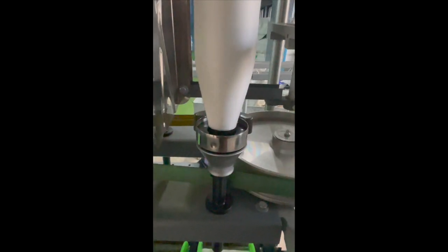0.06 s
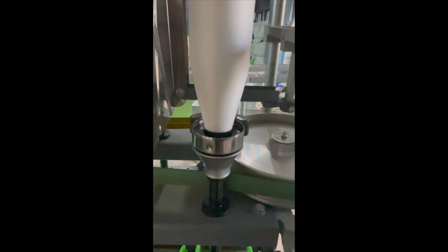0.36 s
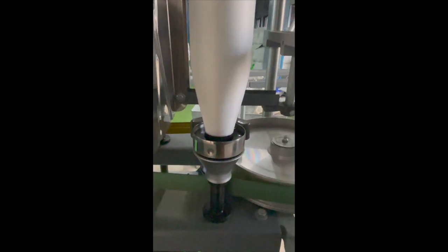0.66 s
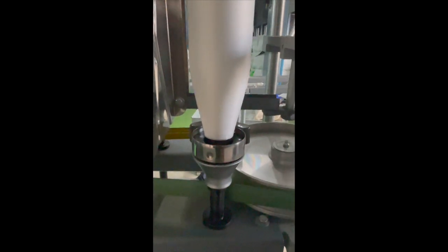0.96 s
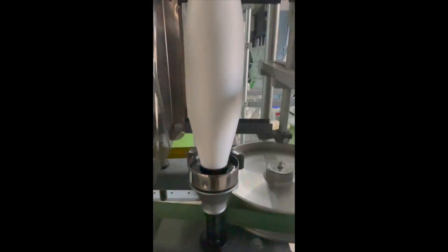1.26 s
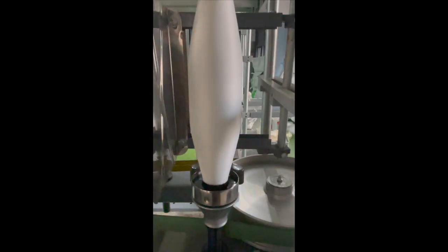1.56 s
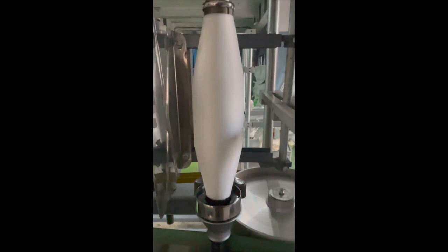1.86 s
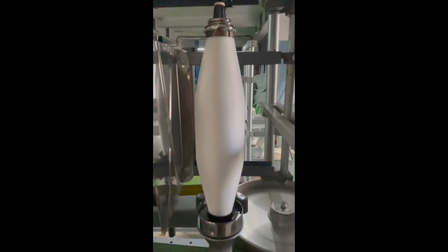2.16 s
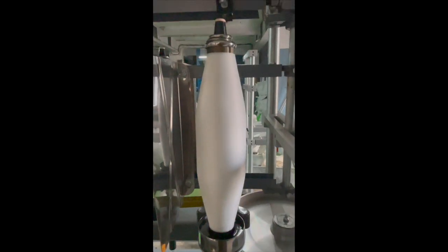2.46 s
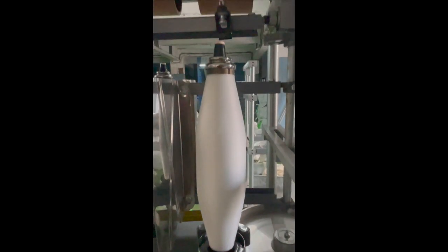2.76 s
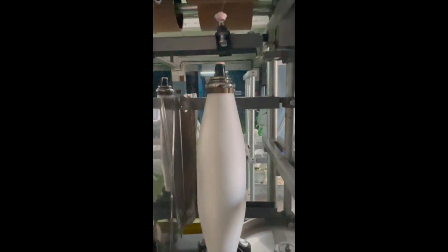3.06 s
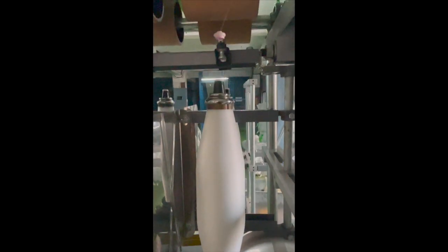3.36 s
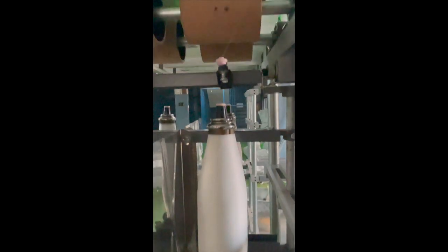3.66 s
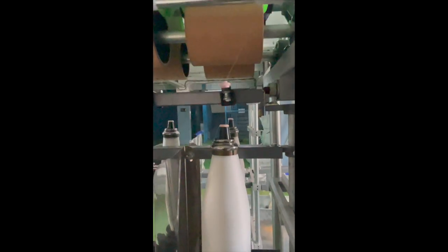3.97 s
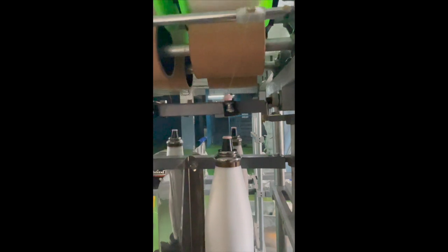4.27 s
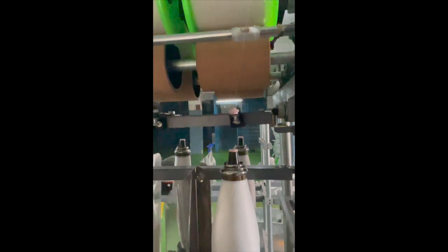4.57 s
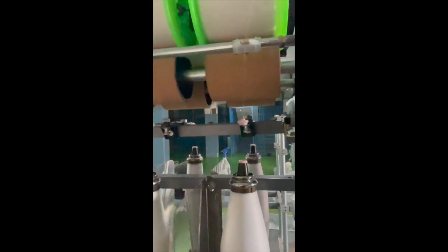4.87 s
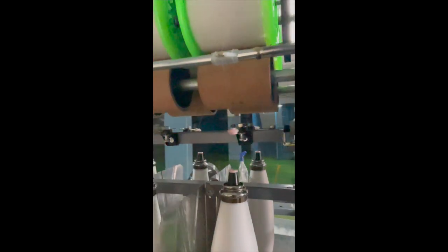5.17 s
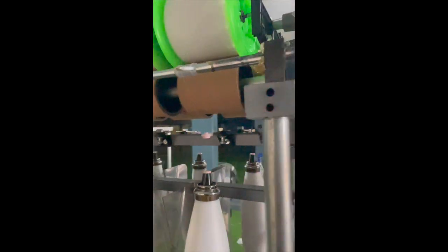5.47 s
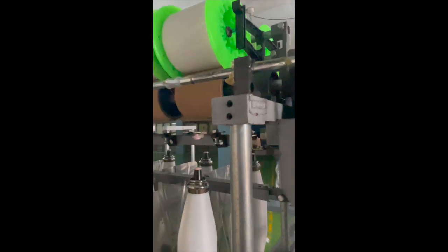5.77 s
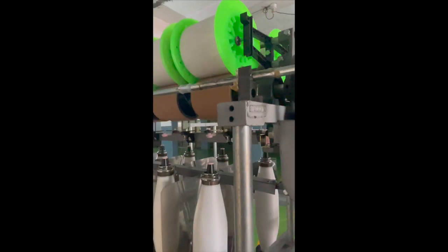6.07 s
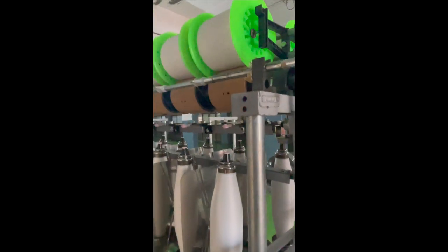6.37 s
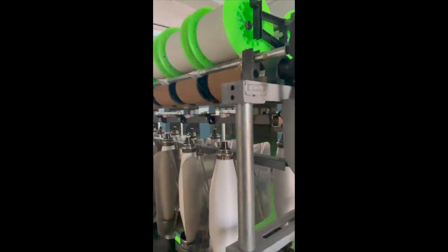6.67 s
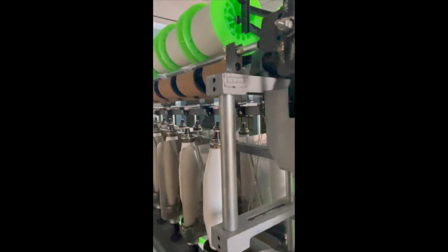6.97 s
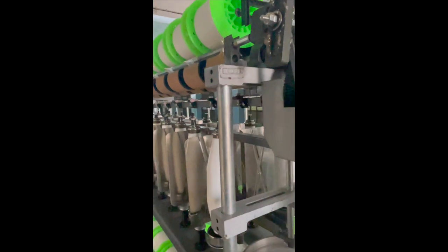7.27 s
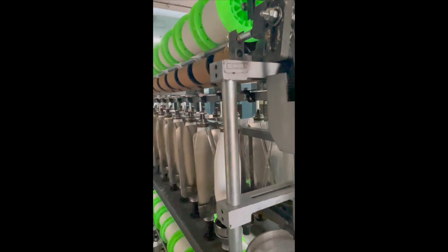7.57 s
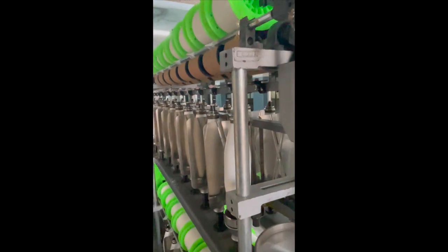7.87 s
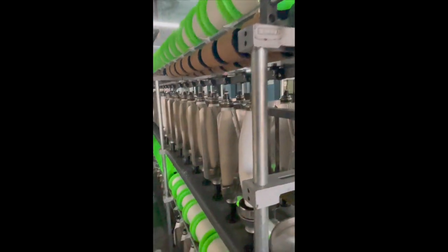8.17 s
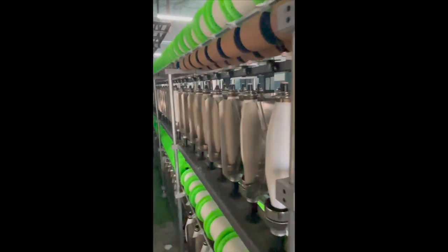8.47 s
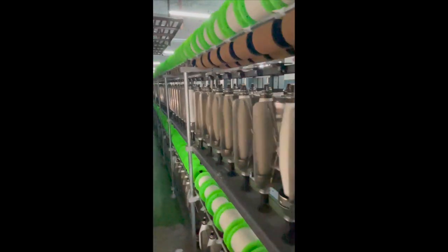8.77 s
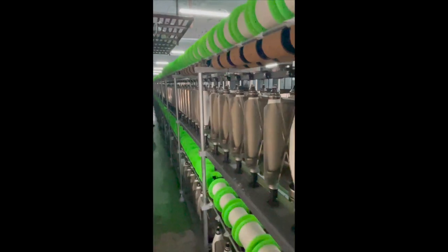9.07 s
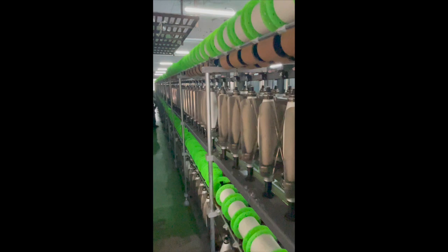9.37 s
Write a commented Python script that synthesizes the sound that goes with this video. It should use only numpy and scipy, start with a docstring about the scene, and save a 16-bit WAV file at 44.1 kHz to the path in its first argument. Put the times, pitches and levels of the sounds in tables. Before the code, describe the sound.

Steady factory roar of many spinning textile spindles up close, with a pulsing low hum, faint high whining tones and a bright hiss.

```python
"""A yarn twisting machine in a factory hall, from a hand-held stereo microphone close to its spindles.
From the start spindles hum and beat near 159 turns a second, bearings and rings whine, yarn hisses,
and the drive rumbles under churned air. Near 1 s the microphone rises past a ring, whose whistle drops
away, and the yarn sizzles. From 3 s it climbs above the yarn and draws back; just after 5 s it turns
aside and the yarn sizzles again. From 7 s it swings to face down the row, and air and hiss grow."""
import sys
import numpy as np
from scipy import signal
from scipy.fft import rfft, irfft, next_fast_len
from scipy.io import wavfile
from scipy.ndimage import map_coordinates

SR = 44100
rng = np.random.default_rng(int(sys.argv[2]) if len(sys.argv) > 2 else 0)


def inscribe(sig):
    """Save sig as 16-bit PCM at rate SR to the path in sys.argv[1].

    A 1-D sig is mono; a 2-D sig holds one channel per row.
    Samples are clipped to [-1, 1] before scaling.
    """
    pcm = np.round(np.clip(np.atleast_2d(sig).T, -1, 1) * 32767)
    wavfile.write(sys.argv[1], SR, pcm.astype(np.int16))


N = 419832

# joint hum of the spindles near the microphone as they beat together: time_s, level_db, pitch_hz
NEAR_HUM = [(0, -34, 159.3), (.35, -28, 159), (.75, -34, 158.5), (1.1, -29.5, 158), (1.5, -43, 158),
            (1.7, -33, 159), (2.55, -27.5, 159.5), (2.85, -33, 159.5), (3.3, -27, 159.3), (3.7, -34, 157.5),
            (4.1, -27, 157), (4.75, -36, 159), (5.3, -35, 157), (5.95, -26.5, 158.5), (6.3, -32.5, 159.3),
            (7.1, -27.5, 159.3), (7.45, -33.5, 159.3), (8.8, -33.5, 159), (9.05, -26.5, 158.5),
            (9.3, -34, 158.5)]
# neighbouring spindles along the row: speed_hz, level_db
ROW_SPINDLES = [(148.1, -42), (156.1, -41.5), (164.3, -40), (167.8, -41), (174.9, -43.5)]
# harmonics of an unbalanced bobbin: speed_multiple, gain_db
UNBALANCE_HARMONICS = [(1, 2), (2, -13), (3, -9)]
# whines of bearings and rings, each shared by many spindles, and at 502 Hz a narrow band at three times a row
# spindle's speed: pitch_hz, spread_hz, level_db
WHINE_BANDS = [(502, 4, -49), (860, 10, -46.3), (1122, 14, -43.8), (1300, 15, -49), (1425, 28, -42),
               (1600, 20, -48), (1830, 8, -47), (1878, 14, -45), (1968, 13, -42.3), (2066, 8, -45),
               (2128, 14, -44), (2165, 12, -41.5), (2197, 11, -39), (2238, 13, -38), (2283, 16, -39.3),
               (2365, 15, -50), (2425, 14, -44.5), (2515, 28, -45.5), (2640, 20, -46), (3100, 25, -41),
               (3230, 48, -40.7), (3490, 40, -49), (4300, 130, -42.5), (4545, 35, -46), (4690, 35, -48),
               (5514, 16, -49.5), (5660, 110, -45), (5798, 12, -49.5), (7603, 28, -39), (7730, 45, -45.5),
               (7975, 50, -39.3), (8160, 65, -46.5)]
# whines that follow the winding stroke: pitch_hz, rise_hz, crest_s, spread_hz, level_db
STROKE_GLIDES = [(5800, 45, 2.5, 12, -47.8), (7595, 90, 4.1, 24, -42.5), (8005, 75, 2.45, 38, -40.5)]
# hiss of the running yarn: frequency_hz, relative_density_db
HISS_SPECTRUM = [(3000, -40), (6000, -9), (8500, 0), (10500, 0), (12000, -1.7), (13000, -3), (15700, -5)]
# spells in which the nearest yarn sizzles: start_s, end_s, level_db
SIZZLE_SPELLS = [(1.2, 4.0, -48.7), (5.3, 7.9, -51)]
# tones of shafts, belts and gears, and at 334.4 Hz a tone at twice a row spindle's speed: pitch_hz, level_db
DRIVE_TONES = [(48.1, -41.5), (56.1, -32), (59.3, -38), (69.3, -40), (73.5, -38), (77.1, -35.6),
               (79, -36.6), (83.2, -39.5), (85, -37.8), (87.8, -38), (90.6, -37.3), (96.3, -39.6),
               (99.1, -36.8), (104.7, -38.8), (115.4, -38.8), (117.6, -39.5), (120.7, -42), (127, -42.5),
               (201, -49), (252, -42), (258, -49), (317, -47.5), (328.5, -48.5), (334.4, -47.3),
               (589, -44.7), (600.5, -48.5), (610.6, -50), (1495, -48), (1722, -50.5), (1889, -48.5)]
# drive rumble and churned air in the hall: frequency_hz, relative_density_db
ROAR_SPECTRUM = [(20, -25), (35, -18), (55, -6.5), (80, -3), (115, -4.5), (135, -6.5), (155, -7),
                 (180, -13.5), (200, -10.5), (400, -14), (700, -16.5), (1050, -18.5), (1550, -17.5),
                 (1900, -15.5), (2850, -22), (4500, -24.5), (4850, -26.5), (5400, -25), (6400, -28),
                 (7400, -28), (8400, -38), (12000, -108)]
# shimmer of the roar and the whines: frequency_hz, depth_db
SHIMMER_DEPTH = [(200, 0), (1000, 1.1), (2200, 1.6), (3000, 2.4), (4500, 2.4), (7000, 1.9)]
# the microphone's two spaced ports: frequency_hz, likeness (0-1), left_lead_rad
PORT_COHERENCE = [(90, 1, 0), (160, .995, 0), (300, .98, .03), (420, .91, .15), (520, .72, .35),
                  (620, .35, .28), (1000, .5, .1), (1350, .43, .1), (1850, .79, .2), (2200, .48, .7),
                  (2600, .42, 1.2), (3150, .23, 2.5), (3600, .12, .6), (4200, .38, .7), (4900, .1, 1.5),
                  (5300, .4, .2), (5800, .75, .38), (6400, .7, .55), (7000, .62, 1.3), (7700, .85, 1.9),
                  (8700, .985, 3.05), (11200, .985, 3.25), (12400, .5, 4.6), (13500, .95, 6.1)]
# left port over right port: frequency_hz, gain_db
PORT_BALANCE = [(100, 0), (210, -.6), (330, -1.7), (500, -2.4), (770, 0), (1170, .8), (1800, 0)]

# the microphone's moves: start_s, end_s
LEAVE_RING = (0.82, 1.9)  # rises away from the spinning ring
PASS_RING = (1.1, 1.7)  # passes the edge of the nearest ring
LEAVE_YARN = (3.0, 4.4)  # climbs above the whirling yarn
LEAVE_BOBBIN = (3.1, 6.6)  # draws back from the nearest bobbin
TURN_AWAY = (5.2, 5.9)  # turns aside from that bobbin
FACE_ROW = (6.9, 11.8)  # turns to face down the row; about halfway round when the sound ends


def near_spindles():
    """Close up, spindles hum near 159 Hz, swelling, sinking and wavering as they beat together."""
    times, levels, pitches = np.transpose(NEAR_HUM)
    t = np.arange(N) / SR
    return amp(np.interp(t, times, levels)) * tone(np.interp(t, times, pitches))


def spindle_overtone(pitch_hz=478, waver_hz=2.2, swell_db=1.5, level_db=-41.3, fall_db=4.5):
    """A faint tone at three times the spindle speed recedes as the microphone turns from the bobbin."""
    gain = amp(level_db - fall_db * progress(TURN_AWAY) + swell_db * wobble(2))
    return gain * tone(pitch_hz + waver_hz * wobble(10))


def row_spindles(drift=0.00298):
    """Farther along the row each spindle slips on the belt by its own share, so their hums beat."""
    pair = np.zeros((2, N))
    for channel in pair:
        for speed_hz, level_db in ROW_SPINDLES:
            turn = angle(speed_hz * (1 + drift * wobble(2)))
            channel += sum(amp(level_db + db) * np.sin(k * turn) for k, db in UNBALANCE_HARMONICS)
    return np.sqrt(2) * pair


def ring_whistle(pitch_hz=5509, waver_hz=5, level_db=-44.5, fall_db=14):
    """The nearest ring sings a thin note that drops away as the microphone rises past it."""
    gain = amp(level_db - fall_db * progress(PASS_RING))
    return gain * tone(pitch_hz + waver_hz * wobble(30))


def bearing_whines():
    """Hundreds of slightly unequal bearings and rings merge into narrow bands; the lowest band, near 502 Hz,
    lies at three times a row spindle's speed."""
    def spectrum(hz):
        power = 0
        for pitch_hz, spread_hz, db in WHINE_BANDS:
            bell = np.exp(-.5 * np.minimum(((hz - pitch_hz) / spread_hz) ** 2, 100))
            power += amp(db) ** 2 / spread_hz * bell
        return np.sqrt(power)

    total_rms = np.sqrt(sum(amp(db) ** 2 for _, _, db in WHINE_BANDS))
    return total_rms * noise(spectrum)


def gliding_whines(stroke_s=3.95):
    """Some rings rise in pitch and settle again once in every winding stroke."""
    t = np.arange(N) / SR
    out = np.zeros((2, N))
    for pitch_hz, rise_hz, crest_s, spread_hz, db in STROKE_GLIDES:
        lift = np.cos(np.pi * (t - crest_s) / stroke_s) ** 4
        out += amp(db) * noise_band(pitch_hz + rise_hz * lift, spread_hz)
    return out


def yarn(hiss_db=-34.5, fall_db=2.1, row_db=1.6, flutter_db=.45, lift_db=.6):
    """Yarn hisses through its guides, softer from above; each sizzle climbs and lifts the hiss."""
    sizzle_hz, rise_hz, spread_hz = 14230, 400, 115
    t = np.arange(N) / SR
    level_db = hiss_db - fall_db * progress(LEAVE_YARN) + row_db * progress(FACE_ROW)
    sizzle = np.zeros((2, N))
    for start_s, end_s, db in SIZZLE_SPELLS:
        elapsed = np.clip((t - start_s) / (end_s - start_s), 0, 1)
        swell = np.abs(np.sin(np.pi * elapsed))
        pitch_hz = sizzle_hz + rise_hz * np.sin(np.pi / 2 * elapsed)
        sizzle += amp(db) * np.sqrt(swell) * noise_band(pitch_hz, spread_hz)
        level_db += lift_db * swell
    hiss = amp(level_db) * noise(lambda hz: amp(along(HISS_SPECTRUM, hz)))
    return (hiss + sizzle) * amp(flutter_db * wobble(20))


def drive(drift_hz=.2, fade_db=1.0):
    """Shafts and pulleys turn at unequal, nearly steady speeds, so their tones throb together; one tone, at
    334.4 Hz, lies at twice a row spindle's speed."""
    out = np.zeros((2, N))
    for pitch_hz, db in DRIVE_TONES:
        gain = amp(db) * unit(amp(fade_db * wobble(1)))
        out += gain * tone(pitch_hz + drift_hz * wobble(1.995))
    return out


def hall_roar(level_db=-20.5, flutter_db=0.22, row_db=2.5):
    """Rumble fills the hall; frame, air and rings fade with distance; the open row lifts the last two."""
    off_ring, off_bobbin = progress(LEAVE_RING), progress(LEAVE_BOBBIN)
    row_lift_db = row_db * progress(FACE_ROW)
    frame_db = -0.83 - 1.1 * off_bobbin
    air_db = -0.45 - .5 * off_ring + row_lift_db
    rings_db = 0.5 - 1.54 * off_ring - off_bobbin + row_lift_db
    bands = [(0, 200, 0), (200, 700, frame_db), (700, 3300, air_db), (3300, SR, rings_db)]
    roar = noise(lambda hz: amp(along(ROAR_SPECTRUM, hz)))
    out = np.zeros((2, N))
    for low_hz, high_hz, db in bands:
        part = filtered(roar, lambda hz: (hz >= low_hz) & (hz < high_hz))
        out += amp(level_db + db + flutter_db * wobble(14)) * part
    return out


def shimmer(x, width_hz=60, life_s=.045):
    """Narrow stretches of the spectrum flare up and sink at random."""
    hz, t, spectra = signal.stft(x, SR, nperseg=2048)
    knots = rng.standard_normal((600, 300))
    grid = np.meshgrid(hz / width_hz, t / life_s, indexing="ij")
    flares = map_coordinates(knots, grid, mode="wrap")
    gain = amp(along(SHIMMER_DEPTH, hz)[:, None] * flares)
    gain /= np.sqrt(np.mean(gain ** 2, axis=1, keepdims=True))  # each frequency keeps its mean power
    return signal.istft(spectra * gain, SR, nperseg=2048)[1][:, :N]


def microphone_ports(pair):
    """Two unrelated sound fields reach the spaced ports partly alike, shifted in phase and level."""
    def blend(hz):
        turn = np.arccos(np.clip(along(PORT_COHERENCE, hz), 0, 1)) / 2
        return np.array([np.cos(turn), np.sin(turn)])

    def shift(hz):
        side = np.array([[.5], [-.5]])  # half to the left, half to the right
        lead = np.exp(1j * side * along(PORT_COHERENCE, hz, column=2))
        return lead * amp(side * along(PORT_BALANCE, hz))

    common, apart = filtered(pair, blend)
    return filtered(np.array([common + apart, common - apart]), shift)


def amp(db):
    """Decibels to gain."""
    return 10 ** (np.asarray(db) / 20)


def unit(x):
    """x at rms 1."""
    return x / np.sqrt(np.mean(x ** 2) + 1e-20)


def along(table, hz, column=1):
    """One column of a table read on a log-frequency axis."""
    columns = np.transpose(table)
    return np.interp(np.log(hz + 1), np.log(columns[0] + 1), columns[column])


def progress(move):
    """How far a move of the microphone has got, from 0 to 1."""
    return np.interp(np.arange(N) / SR, move, [0, 1])


def wobble(rate):
    """A smooth random curve, rate knots a second."""
    t = np.linspace(0, N / SR, 1000)
    coarse = map_coordinates(rng.standard_normal(400), [t * rate + 2], mode="wrap")
    steps = np.linspace(0, 1, N // (len(t) - 1) + 1, endpoint=False)
    return (coarse[:-1, None] + np.diff(coarse)[:, None] * steps).ravel()[:N]


def filtered(x, response):
    """x through a gain that depends on frequency."""
    size = next_fast_len(N + SR // 4)
    return irfft(rfft(x, size) * response(np.fft.rfftfreq(size, 1 / SR)), size)[..., :N]


def angle(hz):
    """Angle of a shaft that turns at the given speed, from a random start."""
    turns = np.cumsum(hz) / SR + rng.random()
    return (2 * np.pi * (turns % 1)).astype(np.float32)


def tone(pitch_hz):
    """Two sines of rms 1 on one moving pitch, in unrelated phases."""
    return np.sqrt(2) * np.sin([angle(pitch_hz), angle(pitch_hz)])


def noise(shape):
    """Two unrelated noises of rms 1 with the given gain over frequency."""
    return unit(filtered(rng.standard_normal((2, N)), shape))


def noise_band(pitch_hz, spread_hz):
    """A narrow band of noise, rms 1, around a moving pitch."""
    rough = noise(lambda hz: np.exp(-np.minimum(hz / spread_hz / 2, 10) ** 2))
    return np.sqrt(2) * rough * np.sin(angle(pitch_hz))


def scene():
    """The hall, the hums and the nearest yarn and ring, heard at the microphone's two ports."""
    hall = shimmer(hall_roar() + bearing_whines()) + gliding_whines() + drive()
    hums = row_spindles() + near_spindles() + spindle_overtone()
    return microphone_ports(hall + hums + yarn() + ring_whistle())


def record(dry, top_hz=15750):
    """The recorder keeps nothing above its band limit."""
    return filtered(dry, lambda hz: hz < top_hz)


dry = scene()
out = record(dry)
inscribe(out)
```